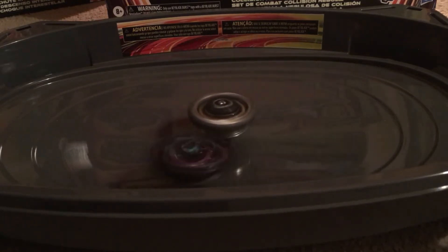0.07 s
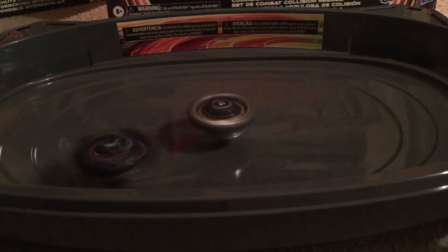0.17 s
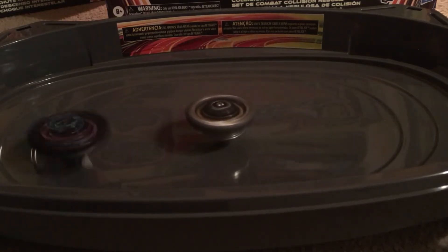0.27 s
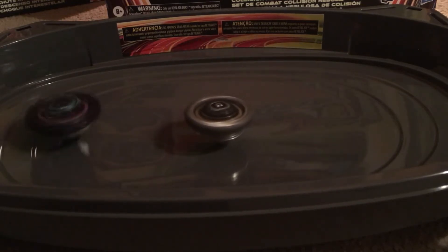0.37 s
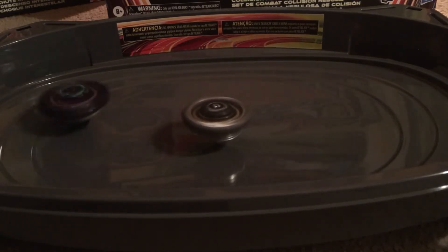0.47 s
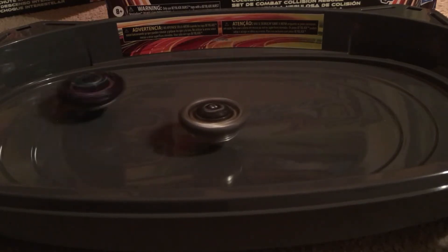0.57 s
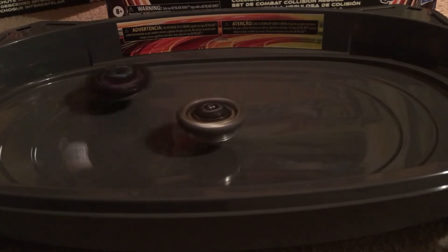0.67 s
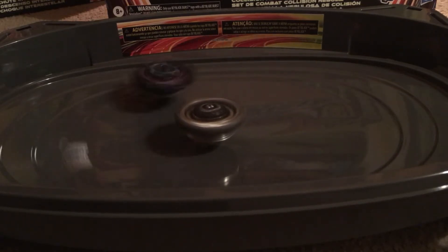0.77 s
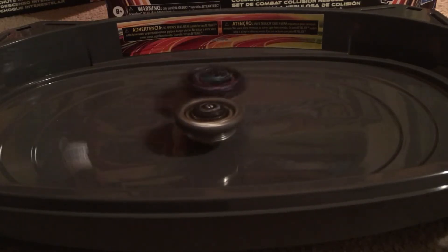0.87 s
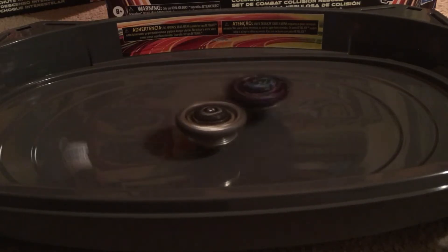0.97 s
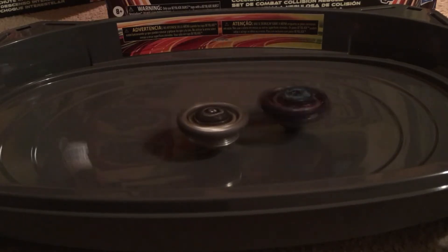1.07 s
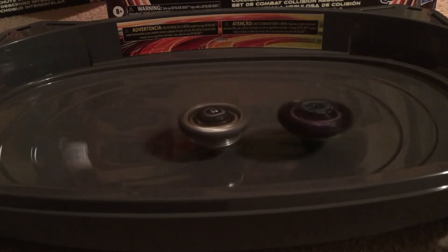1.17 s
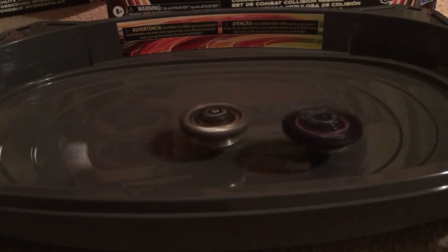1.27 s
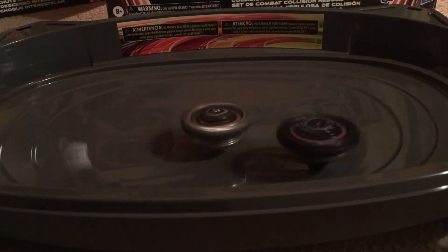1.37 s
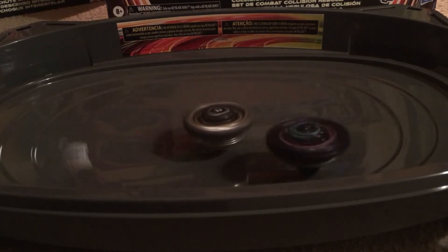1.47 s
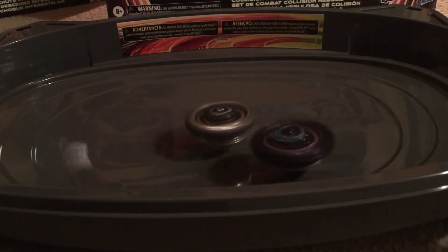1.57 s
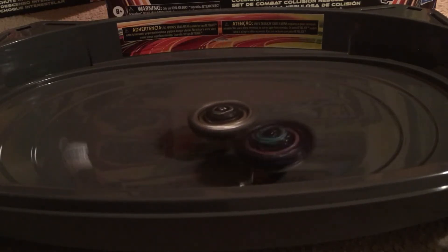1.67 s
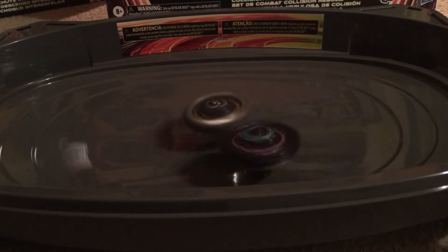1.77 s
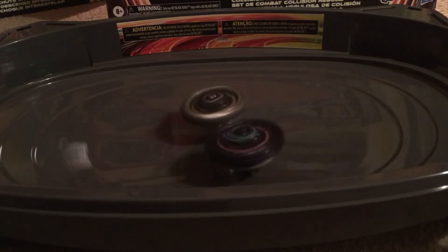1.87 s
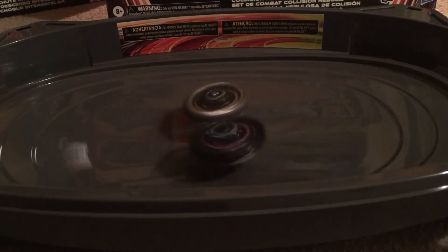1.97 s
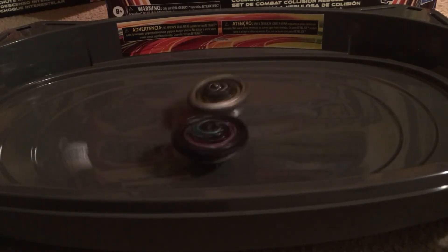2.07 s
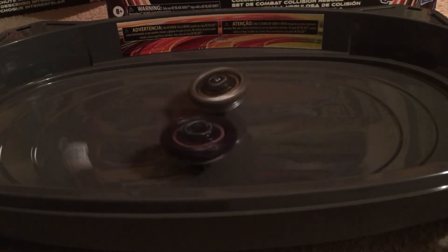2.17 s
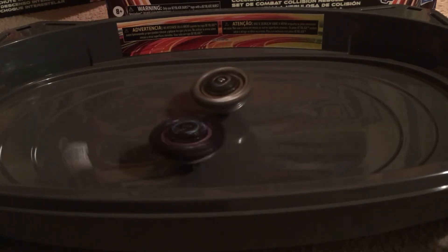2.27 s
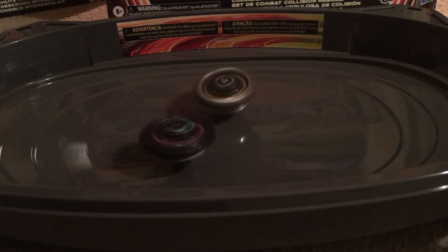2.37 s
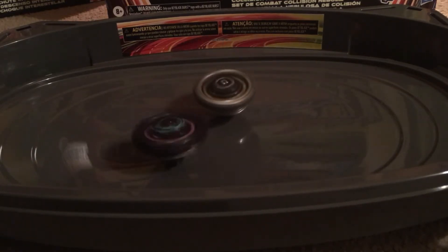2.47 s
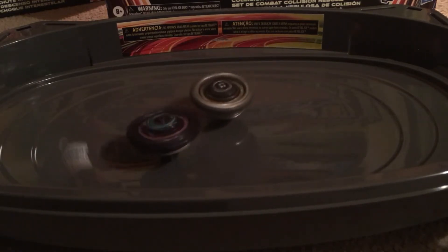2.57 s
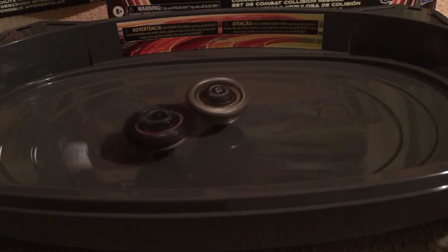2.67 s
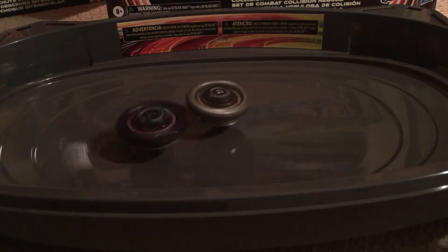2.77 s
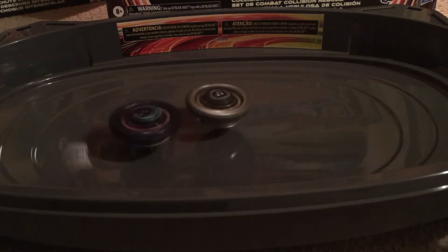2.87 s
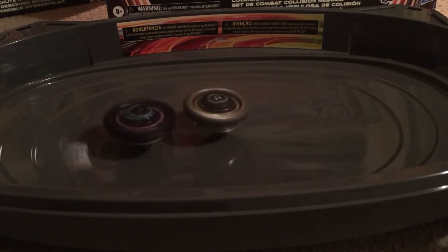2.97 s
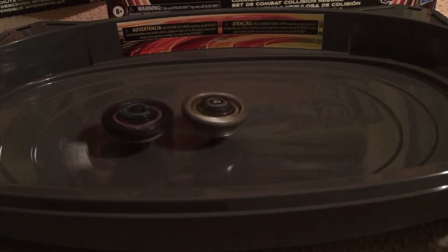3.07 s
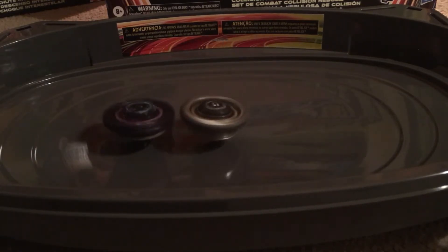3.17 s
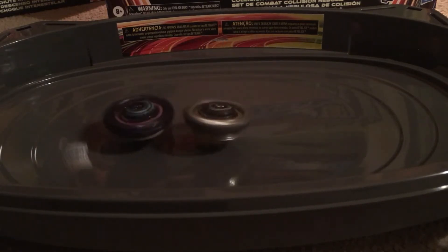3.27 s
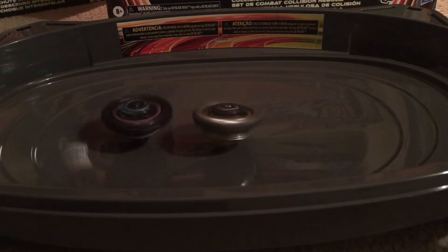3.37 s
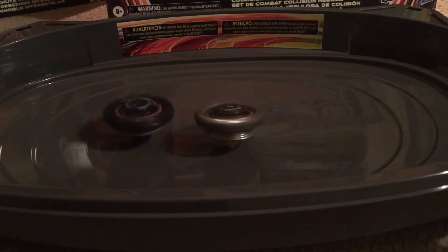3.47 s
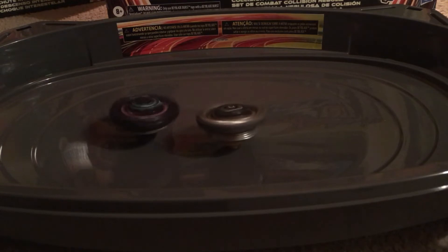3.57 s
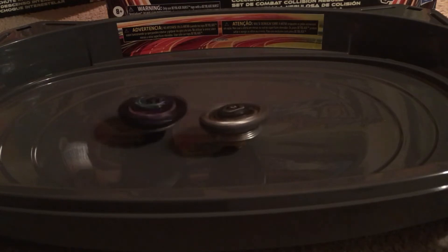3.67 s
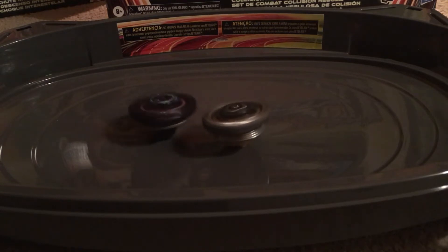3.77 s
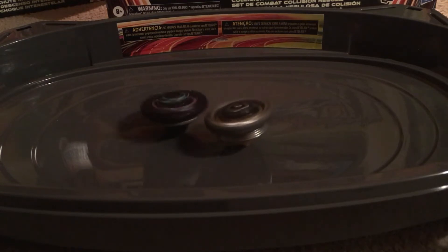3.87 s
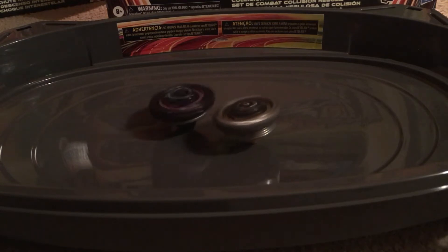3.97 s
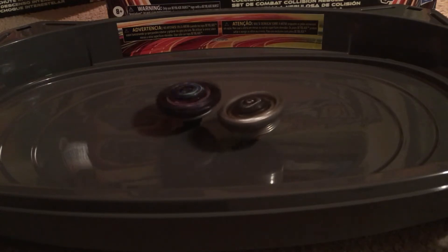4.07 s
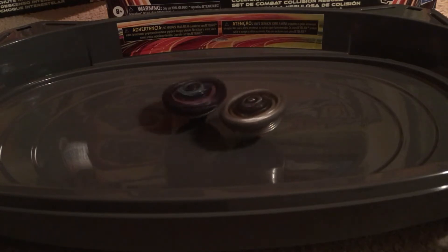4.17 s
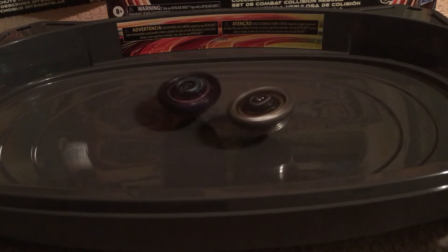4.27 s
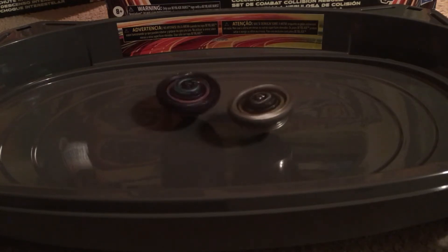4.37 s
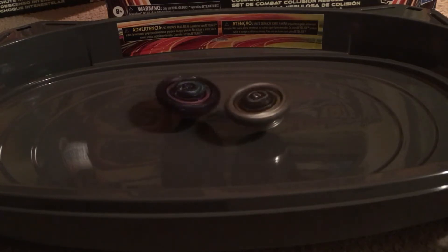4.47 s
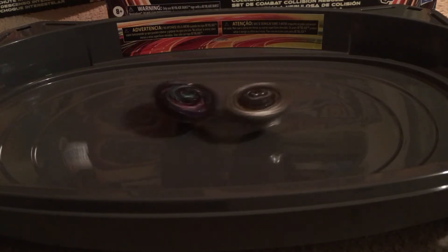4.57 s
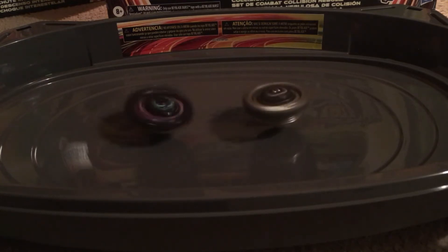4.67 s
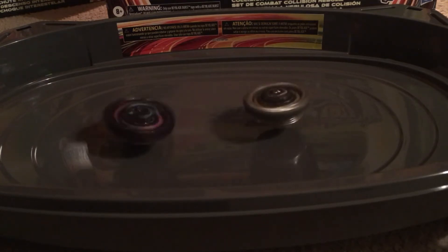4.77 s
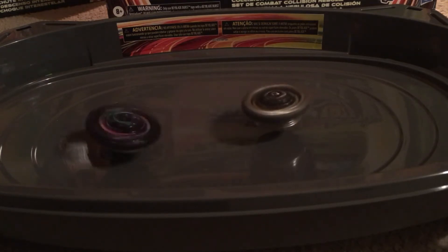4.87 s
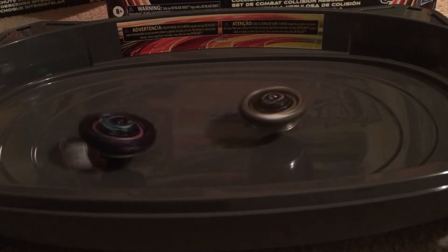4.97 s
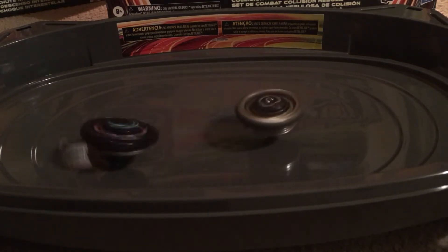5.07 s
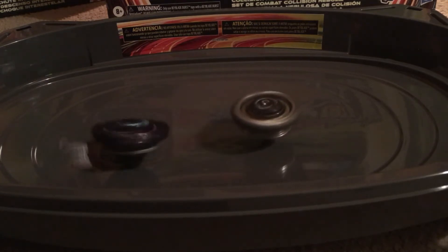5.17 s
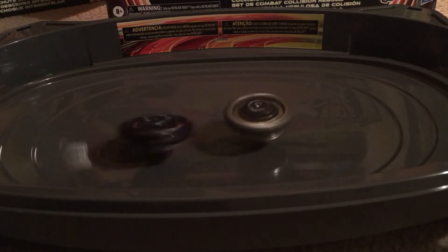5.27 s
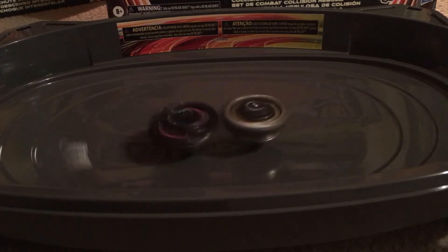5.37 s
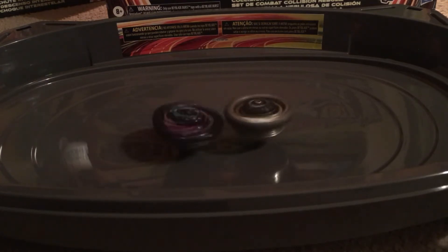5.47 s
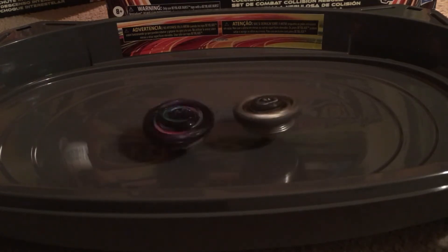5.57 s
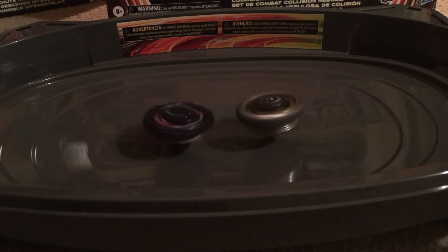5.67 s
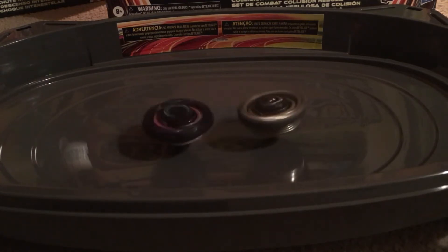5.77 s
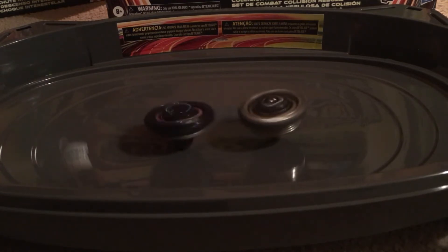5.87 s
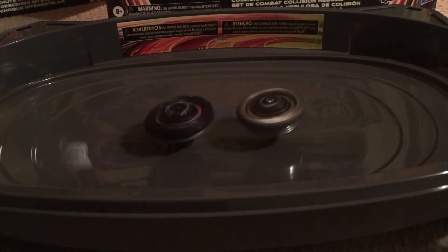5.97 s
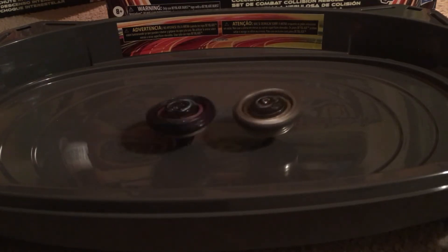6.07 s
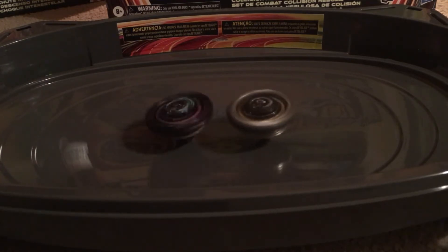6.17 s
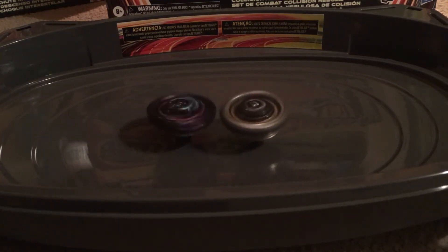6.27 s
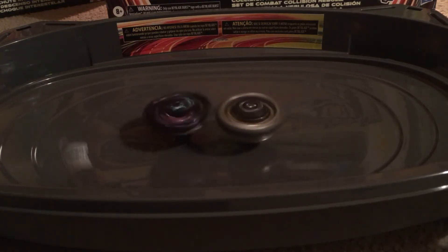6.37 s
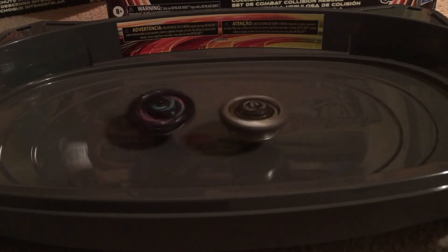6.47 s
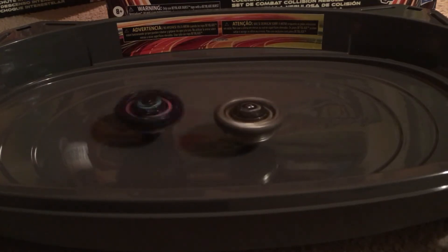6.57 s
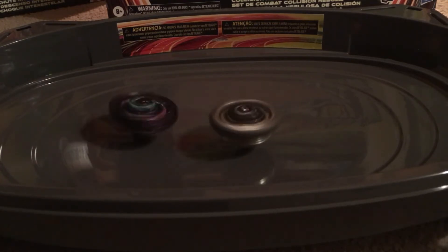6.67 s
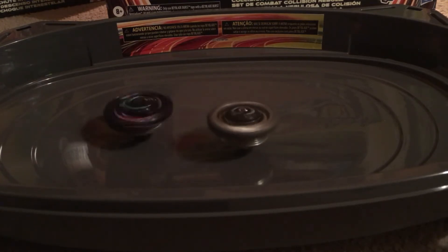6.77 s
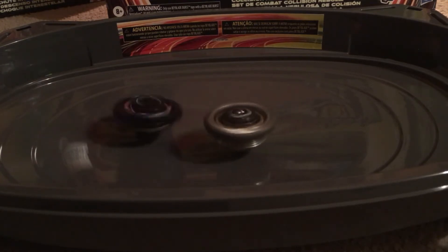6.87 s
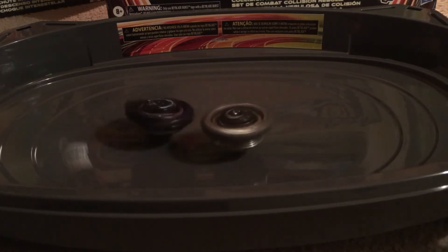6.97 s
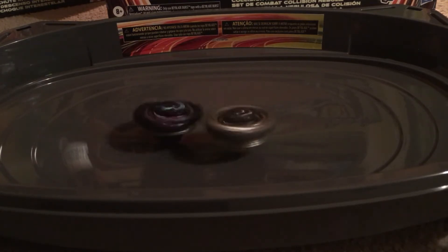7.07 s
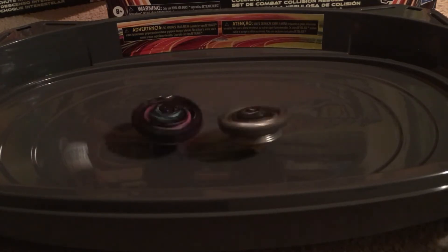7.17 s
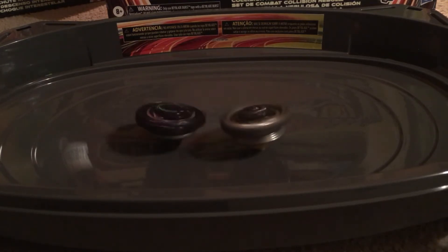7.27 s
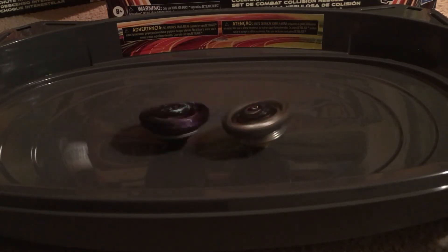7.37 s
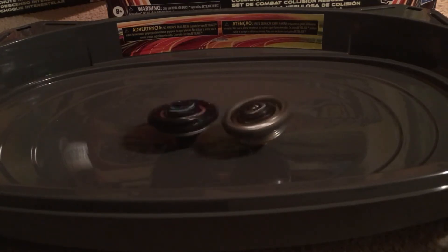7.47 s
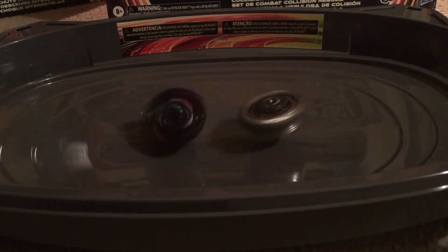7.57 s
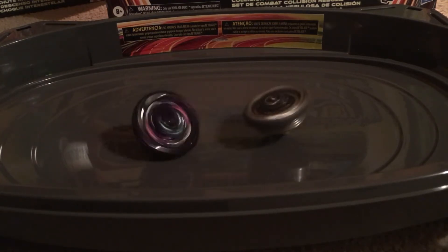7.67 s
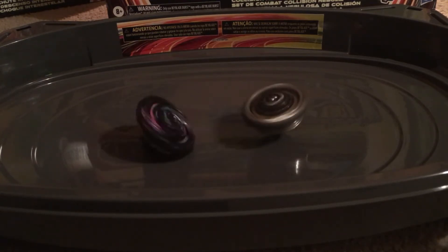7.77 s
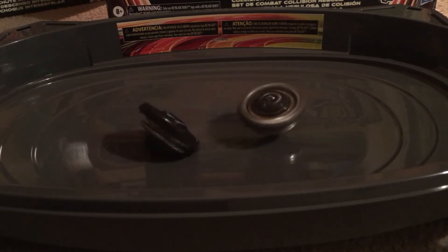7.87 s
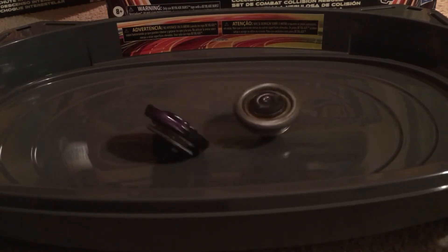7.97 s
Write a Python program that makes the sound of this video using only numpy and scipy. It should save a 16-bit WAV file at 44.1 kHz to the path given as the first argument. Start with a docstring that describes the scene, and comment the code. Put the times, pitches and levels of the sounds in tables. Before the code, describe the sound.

Two toy tops fight in a plastic arena, heard very near with a short room reflection and faint low rumble. Their tips hop, skid and purr on the hollow floor; their rims strike with hard, crackly clacks and a thin, quickly fading metallic ring. Activity comes in flurries separated by quieter spinning, until the last top-heavy wobble clatters and thuds against the plastic.

```python
"""Two toy tops spin in a thin plastic bowl: their metal rims clack together and ring on briefly.
Their tips hop, tap, tick once a turn and scrape on the floor of the bowl.
Blows and friction are shaped noise through resonances of shell and tops, with decaying sines for the notes;
a small room answers with noise tails, over a faint low rumble."""
import sys
import numpy as np
from scipy import signal
from scipy.fft import rfft, irfft, next_fast_len
from scipy.io import wavfile
from scipy.ndimage import uniform_filter1d, map_coordinates

SR = 44100
rng = np.random.default_rng(int(sys.argv[2]) if len(sys.argv) > 2 else 0)


def wav_record(signal):
    """Record a signal, one row per channel, as 16-bit PCM in the file named by sys.argv[1]."""
    frames = np.transpose(np.atleast_2d(signal))
    bounded = np.clip(frames, -1, 1)
    # unit amplitude maps onto the largest positive 16-bit level
    quanta = np.round(bounded * 32767).astype(np.int16)
    wavfile.write(sys.argv[1], SR, quanta)


N = 353682

# Levels in the tables are relative; each layer sets its own gain on top.
# friction of the tips sliding on the bowl: t/s, drone level/dB, hiss level/dB
SLIDING_LEVELS = [(0, -33.5, -32.5), (.24, -42.5, -40), (.4, -48, -49.5), (.55, -47, -48),
                  (.72, -39.5, -35), (1.29, -42.5, -40), (1.36, -58, -60), (1.6, -59.5, -60),
                  (2.0, -44.5, -42), (2.14, -61, -54), (2.41, -64, -65.5), (2.7, -55, -56.5),
                  (3.1, -69.5, -70), (3.22, -55, -61.5), (3.8, -59.5, -58), (4.0, -61, -60.5),
                  (4.53, -69, -64), (4.76, -39.5, -38), (5.0, -61, -52), (5.18, -54.5, -54.5),
                  (5.33, -42.5, -39.5), (5.72, -66.5, -67), (6.27, -66, -69), (6.45, -48, -48),
                  (6.75, -76, -70), (7.1, -46, -52), (7.37, -66, -54), (7.5, -46, -46.5),
                  (7.64, -72, -47.5), (7.71, -35, -38), (7.84, -53, -44.5), (8.02, -45, -47.5)]
# a spinning tip making the shell sing: t/s, level/dB
HUM_LEVELS = [(0, -52), (.5, -66), (1.25, -53), (1.4, -74), (2.2, -53), (2.95, -74.5), (3.2, -49.5),
              (3.85, -64), (4.2, -65), (6.0, -68.5), (6.5, -52), (6.75, -83), (7.1, -47), (8.02, -66)]
# resonances of the plastic shell: f/Hz, width/Hz, level/dB
BOWL_MODES = [(314, 25, -3.5), (448, 82, -6), (598, 130, -7.5), (837, 114, -2), (991, 110, 3),
              (1046, 226, -1), (1293, 83, -2.5), (1388, 83, -5), (2046, 550, -10.5)]
# resonances of the tops: f/Hz, width/Hz, level/dB over the broad colour
TOP_MODES = [(2344, 80, 7), (3307, 110, 6.5), (3910, 61, 0.5), (4323, 91, 6.5), (5830, 410, -14),
             (7530, 1400, -13.5)]
# broad colour of the scraping hiss: f/Hz, level/dB per Hz
HISS_COLOUR = [(880, -29), (1500, 0), (2360, -7), (2770, 4.5), (3410, -7), (5050, -7), (7850, -5),
               (15400, -13), (16500, -4)]
# colour of the background: f/Hz, level/dB per Hz
BACKGROUND_COLOUR = [(12, -28.5), (20, -12), (75, 4), (224, -8), (372, -27), (750, -30), (839, -29),
                     (1650, -52), (3330, -55.5), (3830, -58), (4410, -53.5), (13200, -60.5), (16500, -37)]
# decay of the room: f/Hz, t60/s
ROOM_DECAY = [(300, 0.099), (800, 0.3), (2100, .18), (5500, 0.15), (14600, 0.12)]
# broad colour of the body of a blow: f/Hz, level/dB
CRACK_COLOUR = [(900, -12), (1500, 0), (2200, -1), (4000, 0), (6000, -1.5), (7500, -6), (10000, -15.5)]
# broad colour of its treble snap: f/Hz, level/dB
SNAP_COLOUR = [(4500, -26.5), (6500, 1), (8000, 0), (11000, 0.5), (14000, -2.5), (16500, -11)]
# tips hopping and rims grazing: t/s, level/dB, bowl thud level/dB and treble snap level/dB
# against the blow, main note f/Hz
TAPS = [(.009, -10, -24, -24, 4300), (0.0544, -17, -23, -24, 4300), (0.081, -9, -16.5, -18, 4420),
        (0.1133, -15, -28, -26, 4340), (.157, -18.5, -10, -22, 2600), (0.1872, -18, -25, -19, 4070),
        (0.2015, -13.5, -13, -18, 4360), (0.264, -12.5, -14.5, -15, 3900), (0.279, -15.5, -21, -13, 4330),
        (0.3313, -43, -2, -24, 3600), (0.3744, -30, -5.5, -17, 3800), (0.411, -29.5, -5.5, -9, 3710),
        (.5427, -28.5, -30, -10, 3480), (0.611, -25, -9.5, -20, 3780), (0.6273, -20.5, -9, -15, 3900),
        (0.656, -12, -17, -17, 3920), (.724, -19, -27, -6, 3800), (.756, -16.5, -9.5, -13, 3580),
        (0.7895, -16, -10.5, -20, 4000), (0.8146, -19.5, -3.5, -19, 3370), (0.8357, -11.5, -14, -15, 3460),
        (0.9, -11, -17.5, -22, 3450), (0.9549, -14, -16, -17, 4400), (1.016, -20.5, -7.5, -13, 3740),
        (1.0596, -18.5, -8.5, -10, 3750), (1.1858, -15.5, -13, -24, 4070), (1.269, -16, -12, -26, 4460),
        (1.6513, -26.5, -13, -28, 3400), (1.6898, -18.5, -8.5, -13, 3400), (1.8848, -37, -30, -29, 3000),
        (1.897, -18, -17.5, -31, 3470), (1.941, -17.5, -11.5, -20, 4280), (1.984, -13.5, -13, -13, 4140),
        (2.023, -12, -27, -29, 4300), (2.8825, -37, -8.5, -23, 3300), (3.82, -24.5, -9.5, -23, 3570),
        (3.8705, -18, -12, -22, 3920), (4.1074, -39.5, -1.5, -13, 2350), (4.151, -38, -7, -4, 4250),
        (4.419, -43, -14, -6, 4300), (4.428, -44.5, -8, -8, 4300), (4.4892, -40.5, -3.5, -5, 2470),
        (4.534, -42, -8, 0, 3750), (4.643, -18, -12, -25, 3900), (4.6763, -26, -10, -16, 4080),
        (4.697, -19, -12.5, -14, 3780), (4.7428, -13.5, -31, -21, 3400), (4.758, -18, -12, -5, 4600),
        (4.7738, -11.5, -19, -18, 2380), (4.795, -4.5, -20, -20, 2410), (4.817, -13, -15, -19, 2360),
        (4.8944, -16, -15.5, -27, 4700), (4.9304, -28, -5.5, -18, 2100), (4.9723, -20.5, -9.5, -9, 2180),
        (5.0505, -24.5, -9, -15, 3700), (5.0682, -19, -13, -10.5, 2040), (5.1457, -25.5, -14, -12, 2100),
        (5.1688, -27.5, -19, -26, 3800), (5.193, -21.5, -12.5, -18, 1940), (5.215, -21, -12, -15, 2390),
        (5.243, -22, -9, -13, 3860), (5.261, -10.5, -15, -17, 3940), (5.299, -19.5, -11, -16, 3940),
        (5.3247, -16, -11.5, -17, 4200), (5.5213, -20, -10, -20, 2340), (5.761, -43.5, -4, -23.5, 4350),
        (5.905, -38.5, -4.5, -19, 3380), (6.4328, -28.5, -1, -13, 2400), (6.4523, -25, -6, -12, 3880),
        (6.488, -25.5, -12, -16, 3300), (6.5264, -23, -6, -15, 3440), (6.547, -23.5, -28, -11, 2600),
        (6.575, -21.5, -7.5, -13, 3340), (6.6213, -17, -21, -21, 3710), (6.658, -21, -9, -7.5, 2750),
        (6.689, -31, -10.5, -12.5, 2620), (6.849, -21.5, -12, -11, 1380), (6.8816, -18, -11, -18, 3740),
        (6.9578, -22, -13, -18, 3420), (6.99, -12.5, -16, -19, 3410), (7.193, -36, -10, -3, 4670),
        (7.228, -27, -8.5, -16, 3200), (7.2704, -27, -8, -14, 3200), (7.3218, -25, -9.5, -18, 2040),
        (7.3623, -28.5, -8.5, -22, 3240), (7.4014, -32.5, -1.5, -16, 3320), (7.4363, -25, -5, -15, 3360),
        (7.467, -26.5, -8, -8, 3360), (7.587, -13, -5, -13, 3270), (7.6665, -17.5, -3.5, -8, 2180),
        (7.6915, -23.5, -0.5, -2, 2410), (7.7312, -24, 0.5, -10, 2170), (7.759, -21, -2, -23, 2370),
        (7.775, -8, -33, -14, 4220), (7.7966, -17.5, -3, -19, 2320), (7.8418, -21.5, -1, -13, 2380),
        (7.896, -22, -0.5, -13, 2320), (7.928, -27.5, 0.5, -24, 2430), (7.9757, -25.5, -2.5, -19, 2520)]
# rim blows: t/s, level/dB, bowl thud level/dB and treble snap level/dB against the blow,
# rattle length/s, shell flex level/dB, ring level/dB of each of the four groups of RIM_MODES
CLACKS = [(0.863, -3, -11.5, 2.1, 0.0047, -24, -23, -74, -81.5, -73),
          (0.888, -6.5, -10.5, 5.7, 0.0033, -38, -32, -55, -43, -52.5),
          (1.708, -1.5, -13.5, 3.8, 0.0054, -26, -24.5, -55, -48.5, -49),
          (2.032, 2, -13, 2.6, 0.0042, -39, -22.5, -42.5, -40.5, -62),
          (2.719, -3.5, -15, 6.9, 0.0052, -46, -32.5, -52.5, -60, -79),
          (3.238, -4.5, -12.5, 4.5, 0.0058, -35.5, -17.5, -50, -52, -56),
          (3.893, -1, -13.5, 2.7, 0.0037, -54, -25.5, -47, -56, -63.5),
          (4.172, -7, -10, 6.3, 0.01, -44, -27, -33.5, -45.5, -56),
          (4.556, -3.5, -9.5, 1.7, 0.0097, -21, -28.5, -27, -68, -36.5),
          (5.349, -5.5, -15, 6.2, 0.0098, -40, -19.5, -51, -41, -39),
          (5.47, -3, -17, 1.6, 0.0068, -49, -19, -54, -43, -59.5),
          (6.361, -7, -6.5, 4.6, 0.0077, -37, -25, -51.5, -60, -56.5),
          (7.036, -12.5, -11, 1.2, .011, -40, -37, -69, -73, -75),
          (7.056, -4, -11.5, 4, 0.0066, -43, -24, -33, -41.5, -35.5),
          (7.498, -24, -21, 6.2, 0.012, -59, -38, -75, -75, -75),
          (7.512, -3, -9.5, 2, 0.0069, -21, -31, -24.5, -45, -64)]
# low flexing modes of the shell: f/Hz, level/dB, t60/s
FLEX_MODES = [(319, -4.5, 0.076), (457, -3.5, 0.048)]
# four groups of metal modes in the rims, some in close pairs that beat: f/Hz, level/dB, t60/s
RIM_MODES = [
    [(2375, 0, .045), (3300, -5, .045)],
    [(3775, -12, .45), (3845, -14, .4), (8440, -2, .16), (8630, -6, .24), (10180, -9, .28)],
    [(4310, -3, .6), (4352, -4, .5)],
    [(10930, -2, .45), (11000, -7, .3), (12900, -5, .35)],
]
# runs of one tick a turn, from first tick to last: t/s, level/dB
TICK_RUNS = [
    [(2.1885, -44.5), (2.26, -35), (2.4, -42.5), (2.693, -52.5)],
    [(3.298, -37), (3.7, -37), (3.852, -41)],
    [(5.561, -36.5), (5.703, -42.5)],
    [(5.956, -50.5), (6.328, -39)],
    [(7.175, -43), (7.425, -41)],
]
# notes of a tick: f/Hz, level/dB, t60/s
TICK_NOTES = [(1350, -13, .025), (2380, -13, .02), (3060, -13, .015), (3295, -5, .03), (4340, -12, .035),
              (6500, -13, .012), (7400, -14, .012)]

BOOM_DB, BOOM_GROWS = -55.5, 0.77  # shell rocking: dB at a tabled hiss of -49 dB, dB per dB of hiss
KICK_DB, KICK_S = -45, 0.042  # rocking from a clack: dB against its tabled level, s to fall to 1/e
SPIN_PER_S, SLOWING = 48, 3.5  # turns a second at the start, turns a second lost each second
TAP_RING_DB = -27  # highest rim modes woken by a tap, dB against its snap
TOP_HZ = 16900  # band limit, Hz


def amp(db):
    """Gain of a level in dB."""
    return 10 ** (np.asarray(db) / 20)


def unit(x):
    """Scaled to rms 1."""
    return x / np.sqrt(np.mean(np.abs(x) ** 2) + 1e-20)


def along(points, hz):
    """Interpolate (f/Hz, value) points on a log frequency axis."""
    f, value = np.transpose(points)
    return np.interp(np.log(hz + 1), np.log(f + 1), value)


def curves(rows):
    """One value per sample for each column after the time."""
    s, *columns = np.transpose(rows)
    return [np.interp(np.arange(N) / SR, s, column) for column in columns]


def wobble(rate):
    """A smooth random curve with rate knots a second."""
    knots = rng.standard_normal(int(N * rate / SR) + 4)
    return map_coordinates(knots, [np.arange(N) * rate / SR])


def mix_in(track, at, sound):
    """Add a sound to a track from sample at onwards."""
    track[at:at + len(sound)] += sound


def filtered(x, response):
    """x times a complex response of frequency."""
    m = next_fast_len(N + SR // 2)
    return irfft(rfft(x, m) * response(np.fft.rfftfreq(m, 1 / SR)), m)[..., :N]


def keep_power(x, response):
    """Filter x and divide by the rms gain of the response over the spectrum."""
    gains = np.abs(response(np.linspace(0, SR / 2, num=2000)))
    return filtered(x, response) / np.sqrt(np.mean(gains ** 2))


def modes(table, sign=-1):
    """Causal response of a set of resonances; neighbours swing in opposite sense unless sign is 1."""
    def response(f):
        total = 0
        for k, (centre, width, db) in enumerate(table):
            damping = 1j * f * width
            total = total + sign ** k * amp(db) * damping / (centre ** 2 - f * f + damping)
        return total
    return response


def through_top(x, colour):
    """x given a broad colour and the resonances of the tops."""
    return keep_power(x, lambda f: amp(along(colour, f)) * (1 + modes(TOP_MODES, sign=1)(f)))


def through_bowl(x):
    """x through the resonances of the shell."""
    return keep_power(x, modes(BOWL_MODES))


def ring(table, t):
    """Decaying sines of one ringing, each mode at a new strength and phase."""
    total = np.zeros(len(t))
    for hz, db, t60 in table:
        decay = amp(db + rng.normal(0, 3.1) - 60 * t / t60)
        total += decay * np.sin(2 * np.pi * (hz * t + rng.random()))
    return total


def sliding():
    """Friction drones and hums in the shell and hisses in the tops, the hiss stuttering more when hard."""
    drone_db, hiss_db = curves(SLIDING_LEVELS)
    force = np.clip((hiss_db + 68) / 22, .25, 1)
    grit = amp(force * (4.7 * wobble(70) + 2.8 * wobble(500)))
    # even out the slow level so only the stutter remains
    grit /= np.sqrt(np.abs(uniform_filter1d(grit ** 2, size=SR // 5)))
    drone = unit(through_bowl(amp(3 * wobble(40)) * rng.standard_normal(N)))
    hum_modes = modes([(920, 75, 0), (1400, 130, -6)])
    hum = unit(filtered(rng.standard_normal(N), lambda hz: hum_modes(hz) ** 2))
    hiss = unit(through_top(grit * rng.standard_normal(N), HISS_COLOUR))
    scrape = amp(drone_db - 3) * drone + amp(hiss_db - 4.5) * hiss
    return scrape + amp(curves(HUM_LEVELS)[0] - 8.5) * hum + chatter(hiss_db - 4.5 + 6 * force)


def chatter(level_db):
    """Small irregular skips of a dragging tip, each a brief note near one resonance of the tops."""
    out, t = np.zeros(N + SR), np.arange(SR // 50) / SR
    for when, pick, size, detune in rng.random((2200, 4)):
        at = int(when * N)
        hz = TOP_MODES[int(pick * 4)][0] * (1 + 0.11 * (detune - .5))
        # small draws of size make the rare loud skips
        decay = amp(level_db[at] - 3.3 * np.log(size + .02) - 60 * t / .009)
        mix_in(out, at, decay * np.sin(2 * np.pi * hz * t))
    return out[:N]


def background():
    """Low rumble of the house with a faint broad hiss, and the boom of the shell rocked by tips and clacks."""
    noise = filtered(rng.standard_normal(N), lambda hz: amp(along(BACKGROUND_COLOUR, hz)))
    boom = filtered(rng.standard_normal(N), lambda hz: modes([(105, 70, 0)])(hz) ** 2)
    t = np.arange(N) / SR
    rocking = amp(BOOM_DB + BOOM_GROWS * (curves(SLIDING_LEVELS)[1] + 49))
    for s, db, *_ in CLACKS:
        rocking += amp(db + KICK_DB) * np.exp(-np.abs(t - s) / KICK_S) * (t > s)
    return amp(-52.0 + 0.63 * wobble(5)) * unit(noise) + rocking * unit(boom)


def room(x):
    """Walls answer after about 6 ms with a noise tail, redrawn every 0.3 s, that dies at its own rate per band."""
    out, hop = np.zeros(N + SR), int(SR * .3)
    for at in range(0, N, hop):
        hz, t, z = signal.stft(rng.standard_normal(SR // 3), SR, nperseg=256)
        decay = amp(-60 * t / along(ROOM_DECAY, hz)[:, None])
        tail = signal.istft(z * decay, SR, nperseg=256)[1]
        tail *= .6 + .4 * (np.arange(len(tail)) > .008 * SR)  # the first 8 ms are weaker
        wet = signal.fftconvolve(x[at:at + hop], tail / np.linalg.norm(tail))
        mix_in(out, at + 260, wet)
    return out[:N]


def blows(rows):
    """Each blow (t/s, level/dB, thud/dB, snap/dB, length/s) is a short noise rattle shaking bowl and tops."""
    thud, crack, snap = np.zeros((3, N + SR))
    t = np.arange(SR // 12) / SR
    for s, db, thud_db, snap_db, length in rows:
        at, length = round(s * SR), max(length, .002)
        rattle = (1 - np.exp(-t / 0.0014)) * np.exp(-(t / length) ** 1.42)
        push = (1 - np.exp(-t / 0.0011)) * np.exp(-t / (1.44 * length))
        shake = rng.standard_normal((3, len(t)))
        mix_in(thud, at, amp(db + thud_db - 4.5) * shake[0] * push)
        mix_in(crack, at, amp(db - 11.0) * shake[1] * rattle)
        mix_in(snap, at, amp(db + snap_db - 1.5) * shake[2] * rattle * np.exp(-t / 0.0092))
    in_tops = through_top(crack[:N], CRACK_COLOUR) + through_top(snap[:N], SNAP_COLOUR)
    return through_bowl(thud[:N]) + in_tops


def taps():
    """A landing tip rattles and favours one short note; a thudding landing rattles longer."""
    rows, notes, t = [], np.zeros(N + SR), np.arange(SR // 3) / SR
    for s, db, thud_db, snap_db, hz in TAPS:
        envelope = amp(db - 8.0 - 60 * t / 0.023) * (1 - np.exp(-t / 0.00093))
        note = envelope * np.sin(2 * np.pi * hz * t)
        metal = amp(db + snap_db + TAP_RING_DB) * ring(RIM_MODES[-1], t)
        mix_in(notes, round(s * SR), note + metal)
        rows.append((s, db, thud_db, snap_db, 0.0051 + 0.0078 * amp(thud_db)))
    return notes[:N] + amp(-3.0) * blows(rows)


def clacks():
    """Rim against rim: a hard rattle, and apart from it a low flex of the shell and the metal left ringing."""
    rows, ringing, t = [], np.zeros(N + SR), np.arange(SR // 2) / SR
    for s, db, thud_db, snap_db, length, flex_db, *ring_db in CLACKS:
        rows.append((s, db + 3.5, thud_db - 8.0, snap_db - 6, length))
        sound = amp(flex_db) * ring(FLEX_MODES, t) * (1 - np.exp(-t / .003))
        for group_db, group in zip(ring_db, RIM_MODES):
            sound += amp(group_db) * ring(group, t)
        mix_in(ringing, round(s * SR), sound)
    return blows(rows), ringing[:N]


def ticks():
    """An unbalanced top knocks once a turn on the same few notes; a loose part answers a few ms later."""
    rows, notes, t = [], np.zeros(N + SR), np.arange(SR // 16) / SR
    for run in TICK_RUNS:
        s, db = np.transpose(run)
        turns = SPIN_PER_S - SLOWING * (s[0] + s[-1]) / 2  # spin rate midway through the run
        for at in np.linspace(s[0], s[-1], num=round((s[-1] - s[0]) * turns) + 1):
            early, first, second = rng.standard_normal(3)
            at += 0.00025 * early
            level = np.interp(at, s, db) + 1.1 * first
            rows.append((at, level + 6, -7, -15, .0035))
            rows.append((at + 0.0053, level + 0.83 * second, -8, -20, .004))
            knock = amp(level) * ring(TICK_NOTES, t) * (1 - np.exp(-t / .0007))
            mix_in(notes, round(at * SR), knock)
    return blows(rows) + notes[:N]


def scene():
    """Everything in the bowl, its room and the background; the ringing and flexing of clacks skips the room."""
    hits, ringing = clacks()
    near = hits + taps() + ticks() + sliding()
    return (near + ringing + amp(-12.5) * room(near) + background())[None]


def record(dry):
    """The loudest peaks saturate softly; nothing is kept above the band limit."""
    soft = dry / (1 + np.abs(dry / 1.2) ** 6) ** (1 / 6)
    return filtered(soft, lambda hz: np.clip((TOP_HZ - hz) / 1300, 0, 1) ** 3)


dry = scene()
out = record(dry)
wav_record(out)
```